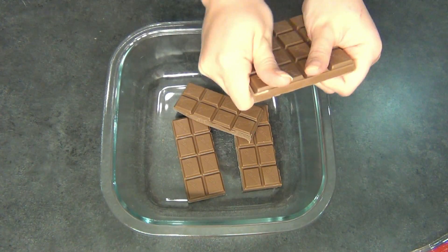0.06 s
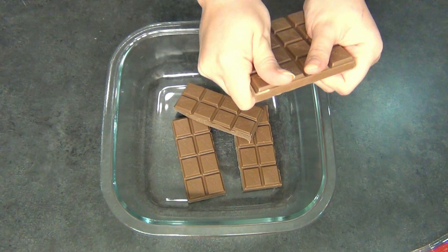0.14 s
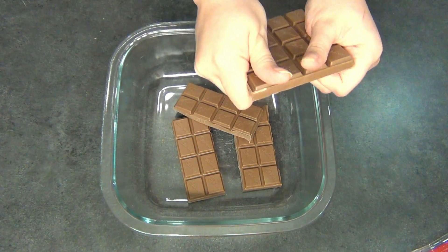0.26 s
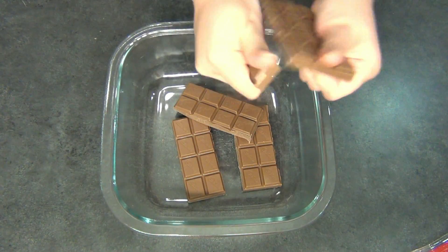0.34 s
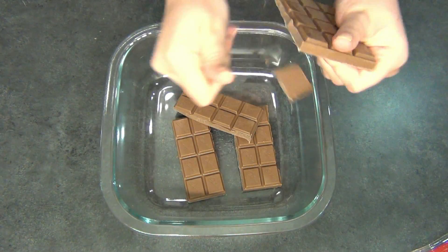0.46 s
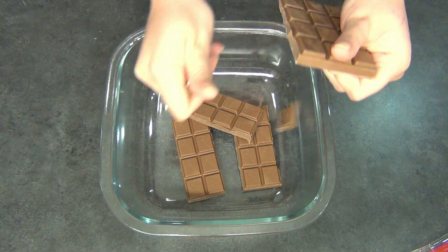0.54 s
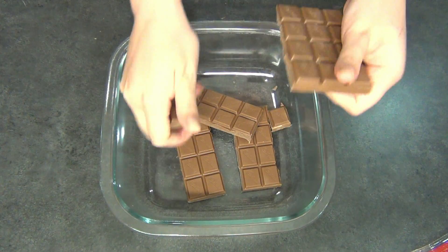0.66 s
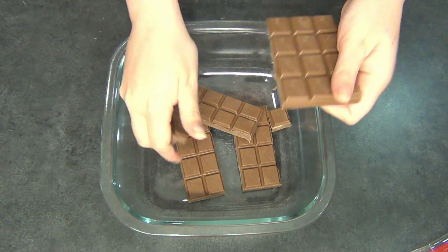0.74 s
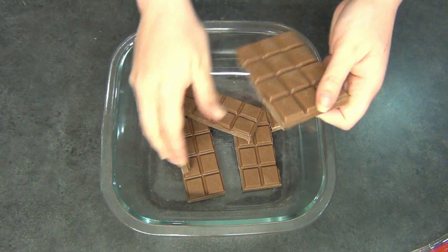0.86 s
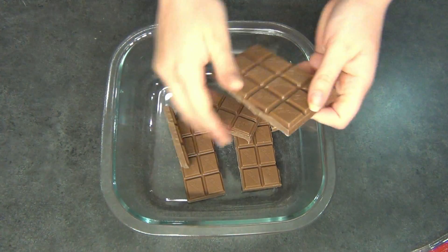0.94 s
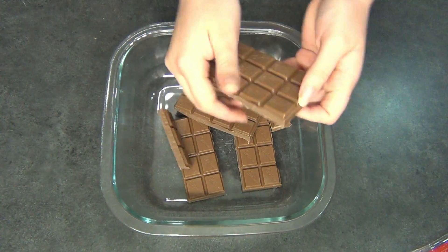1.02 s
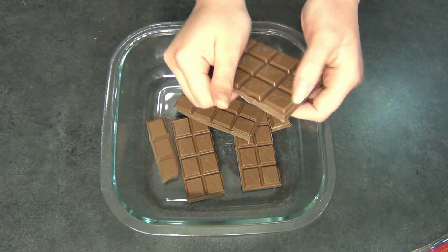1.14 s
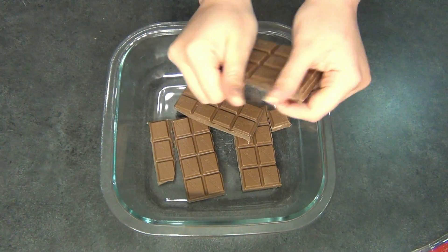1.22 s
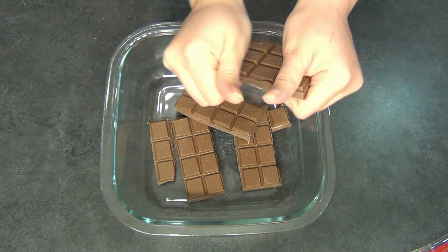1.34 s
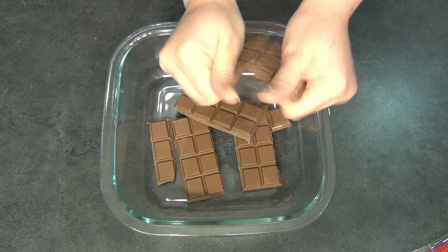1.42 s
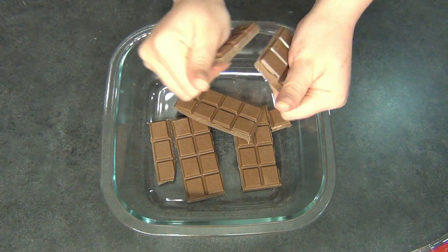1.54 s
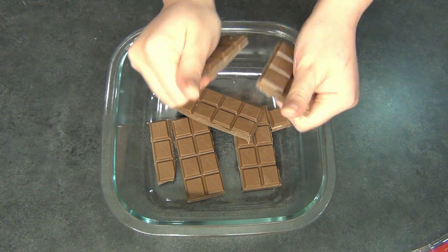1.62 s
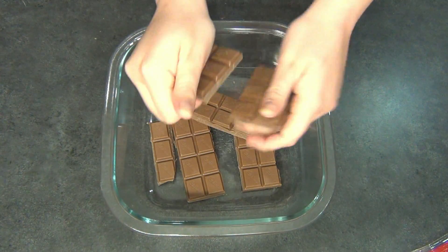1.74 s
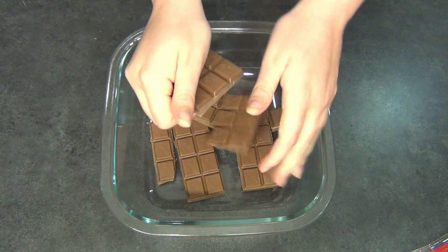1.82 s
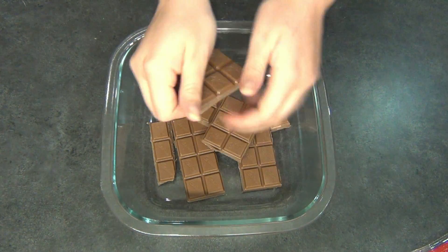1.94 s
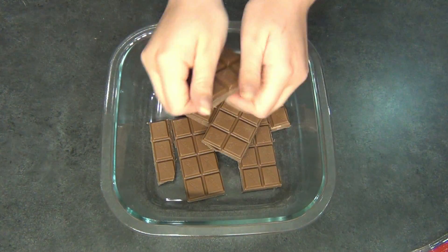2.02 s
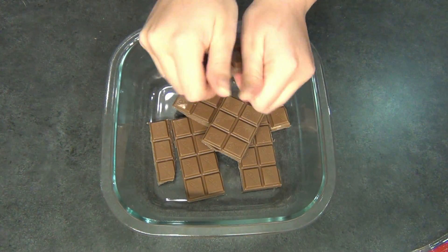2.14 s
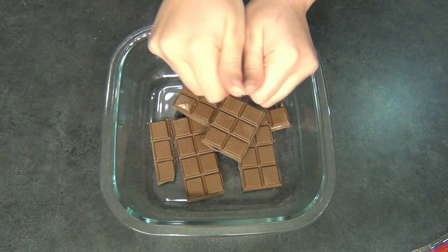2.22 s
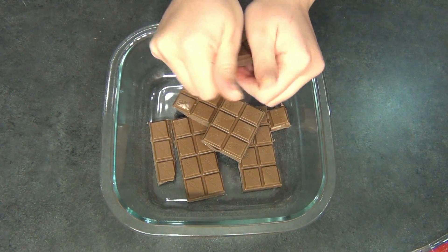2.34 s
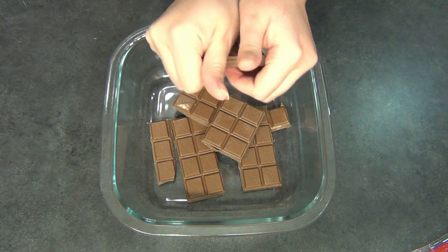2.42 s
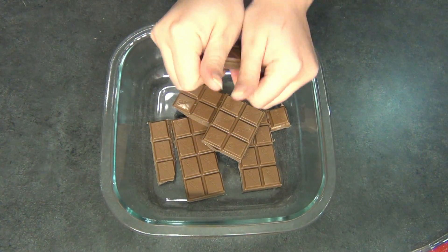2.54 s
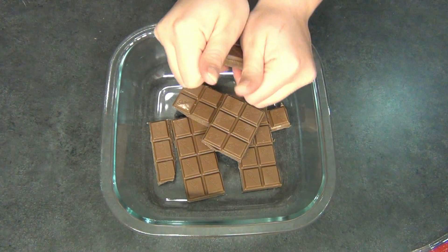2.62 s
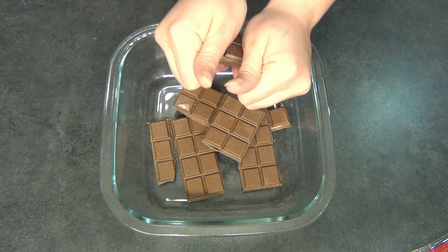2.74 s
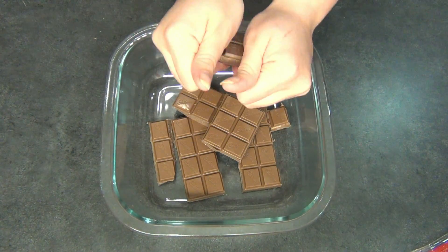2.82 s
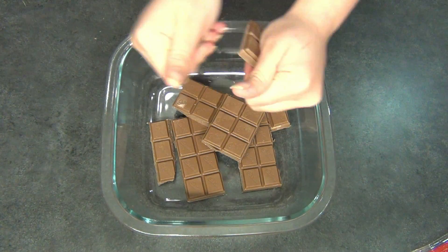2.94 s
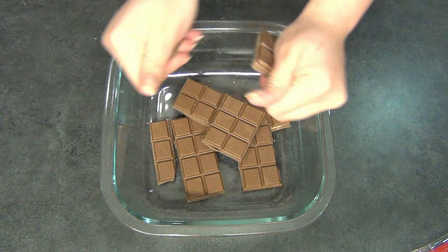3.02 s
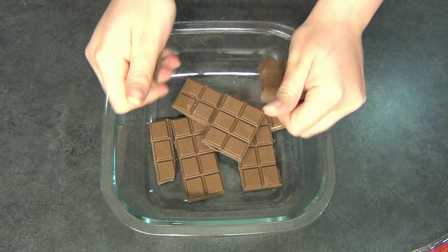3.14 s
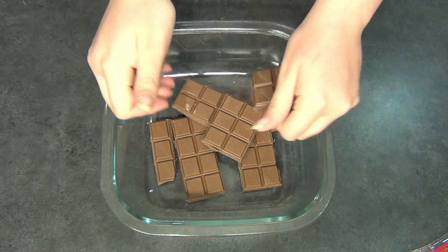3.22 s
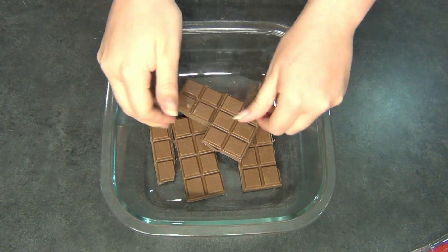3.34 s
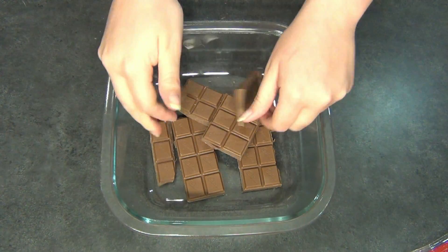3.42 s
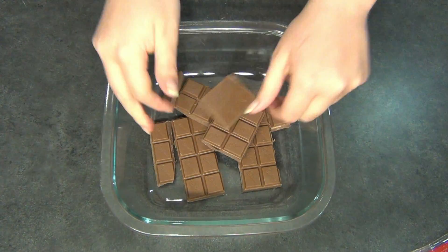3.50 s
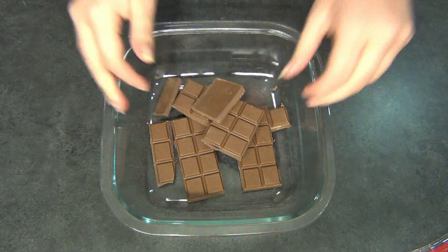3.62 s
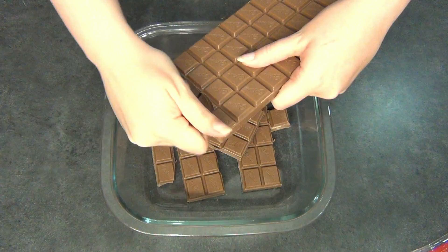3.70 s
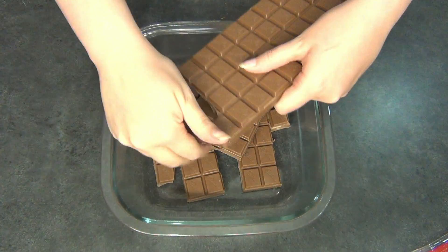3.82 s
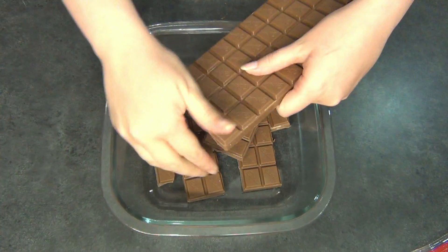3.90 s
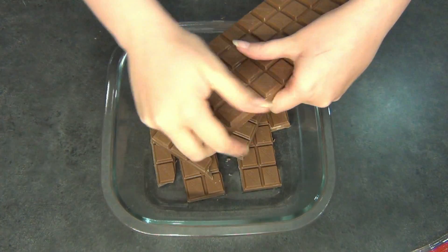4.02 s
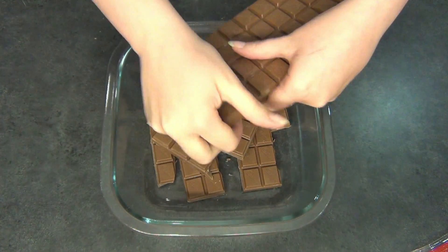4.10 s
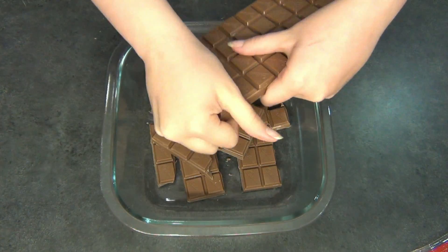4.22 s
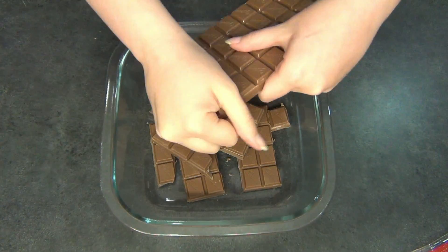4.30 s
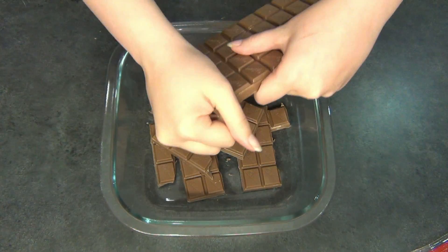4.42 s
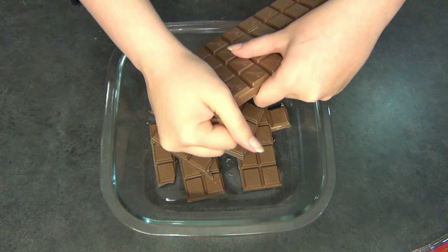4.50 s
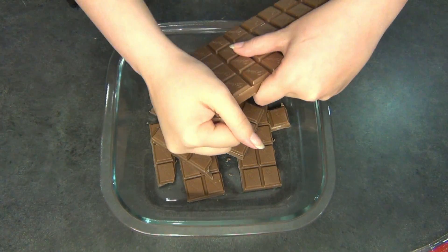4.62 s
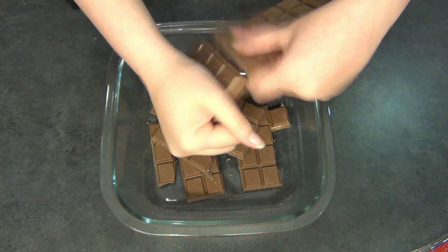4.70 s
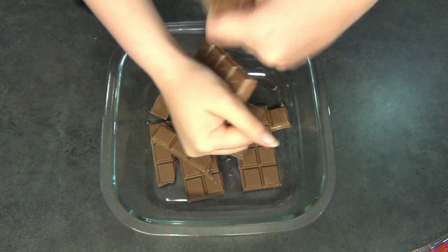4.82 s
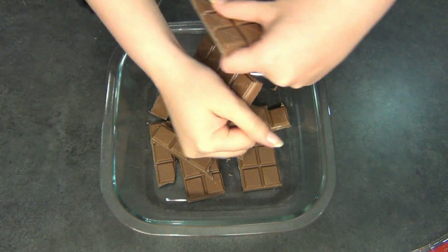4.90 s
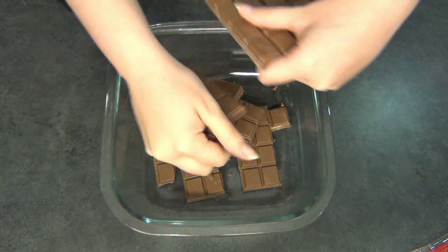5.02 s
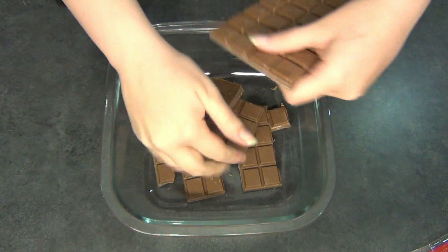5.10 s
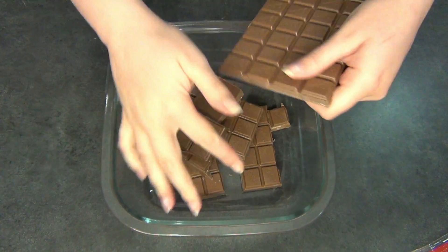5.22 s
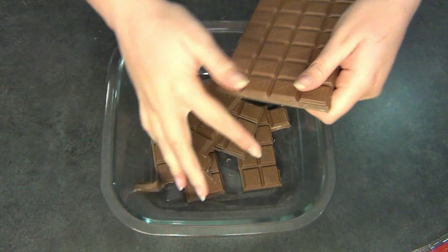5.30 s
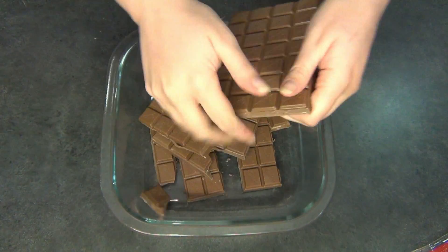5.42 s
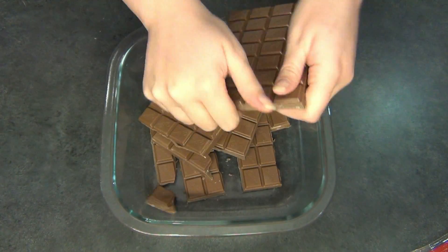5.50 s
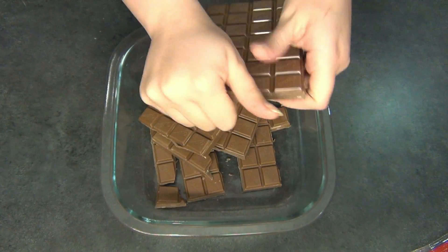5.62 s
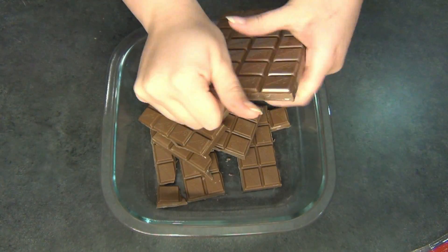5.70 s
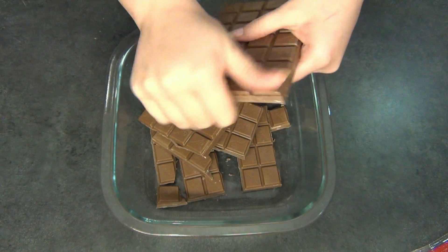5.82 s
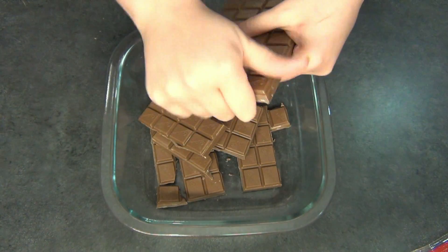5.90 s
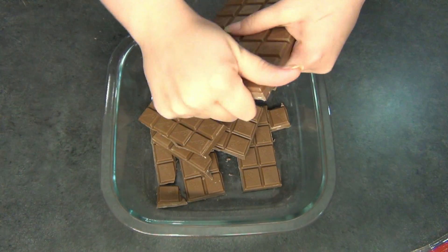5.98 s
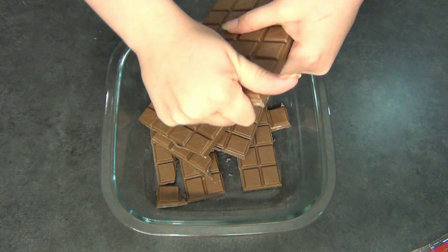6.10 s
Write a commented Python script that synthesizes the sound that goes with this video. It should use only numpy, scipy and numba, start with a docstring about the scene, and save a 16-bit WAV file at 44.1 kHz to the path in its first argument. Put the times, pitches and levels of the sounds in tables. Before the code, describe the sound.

Sharp, brittle cracks of a chocolate bar broken by hand, mixed with clacks and clinks of chunks dropping into a glass dish.

```python
"""A chocolate bar is snapped by hand, and the pieces drop into a glass dish on a kitchen worktop.
Each snap is a short, brittle crack. Each landing clacks on the glass and thumps the dish on the
worktop, and two knocks on its side make it sing. Fingers rub softly over faint room air and hum.
The bare room echoes, and a limiter turns the loud hits down so that their echo swells up behind them."""
import sys
import numpy as np
from scipy import signal
from scipy.fft import rfft, irfft, next_fast_len
from scipy.io import wavfile
from scipy.ndimage import uniform_filter1d, minimum_filter1d
from numba import njit

SR = 44100
rng = np.random.default_rng(int(sys.argv[2]) if len(sys.argv) > 2 else 0)


def unload_audio(sound):
    """Save the sound as a 16-bit wav file, at the path given as the first command line argument."""
    columns = np.transpose(np.atleast_2d(sound))
    # keep every value between -1 and 1, then stretch to whole-number steps
    steps = np.round(np.clip(columns, -1, 1) * 32767)
    wavfile.write(sys.argv[1], SR, steps.astype(np.int16))


N = 271215

# A fade time (t60) is how long a sound takes to drop by 60 dB.
# the tones of the freely ringing dish: (pitch [Hz], relative level [dB], fade time [s])
GLASS_TONES = [(839, -4.5, 0.067), (2360, -5, 0.21), (2900, -32, 0.14), (3100, -29, 0.12),
               (3670, -19, 0.12), (3940, 10, 0.048), (4630, 1.5, 0.071), (5460, -17, 0.11),
               (5240, -69, 0.05), (5580, -29, 0.16), (6150, -15.5, 0.25)]
# its highest tones, woken by a sharp edge or a knock: (pitch [Hz], relative level [dB], fade time [s])
PING_TONES = [(5670, 0, 0.11), (6500, 6, 0.081), (7500, -6, 0.05), (8000, -22, 0.049), (8800, 0, 0.088),
              (9730, 11.5, 0.062), (11870, 4, 0.12), (13100, 10, 0.062)]


def snaps(start, stop):
    """A crack races through the bar, and the freed piece rings for an instant."""
    # each break: (time [s], level [dB], pitch of the piece [Hz], piece level against the crack [dB])
    breaks = [(0.3905, 19.5, 1440, -17), (.4529, -8, 3070, 3), (1.513, 12, 725, -14.5),
              (2.9422, 6, 2270, 0.5), (4.4128, 13.5, 870, -18.5), (4.7882, 20, 1300, -11)]
    # the tone colour of a crack: (frequency [Hz], relative level [dB])
    crack_colour = [(100, -31), (300, -9.5), (700, -7), (1500, 2), (3500, 3), (6500, 3.5), (9000, 5),
                    (12000, 4.5), (14500, 3.5), (17000, -55)]
    track = np.zeros(N)
    bands = np.geomspace(300, 17000, 26)
    for s, db, hz, piece_db in between(breaks, start, stop):
        ripple_db = rng.standard_normal(len(bands))  # no two breaks have the same shape
        shape = np.c_[bands, read(crack_colour, bands) + ripple_db]
        add(track, s, unit(colour(burst(t60=0.025), shape)), db)
        add(track, s, piece_ring(hz, t60=0.02, q=1.5), db + piece_db)
    return track


def landings(start, stop):
    """A piece lands: its edge ticks, piece and glass clack, and the dish thumps on the worktop."""
    # each hit on the dish or the pile; a flat face gives a low pitch, a corner a high one:
    # (time [s], strength [dB], thump level [dB], contact pitch [Hz])
    all_hits = [ (0.619, 7.5, -10, 1760), (0.6281, 19, -10, 4300), (0.6576, 6.5, -2.5, 3830),
                (0.8848, 4.5, -1, 1700), (0.9049, 16, 10.5, 2770), (0.9126, 12.5, 3, 3460),
                (0.9172, 21, 2.5, 3020), (1.0071, 17, 7, 2920), (1.073, -7, 2.5, 2800),
                (1.178, -12.5, -5, 1620), (1.2442, 17.5, 2.5, 3960), (1.2792, 2, 5, 1680),
                (1.9082, 8.5, 4, 1610), (1.9114, 13.5, 10, 1560), (1.9193, 5, 4, 1630),
                (1.9368, 25, 10.5, 4800), (1.9631, 7.5, 5, 3750), (1.9735, 11.5, 8.5, 4380),
                (2.164, -28, -30, 9070), (3.4695, 3.5, 9, 1570), (3.4831, -16, 2, 3920),
                (3.5047, 10, 7, 1690), (3.5322, -4, -6, 7400), (3.552, 12.5, -6, 4350),
                (3.584, 4.5, 3, 2900), (3.592, 5.5, -6, 1570), (3.6086, 16.5, -1, 6400),
                (3.627, 0, 0, 4940), (3.6333, 13.5, 1.5, 3270), (3.6493, 3, -0.5, 3230),
                (3.7312, -2, -2, 3250), (3.9604, 3.5, 8, 3120), (3.9781, 8.5, 9.5, 1640),
                (3.993, 7.5, -1, 3940), (4.0314, 17.5, -7, 5480), (5.1747, 2.5, 7, 1620),
                (5.1888, 10, 9, 1570), (5.192, 10.5, -7, 1480), (5.2105, 7.5, 12.5, 3350),
                (5.2334, 9, -3, 4370), (5.3753, 18.5, 12, 5200), (5.401, 1, 5, 4250),
                (5.4308, 1, 4.5, 2970), (5.5, -3.5, 4.5, 1330), (5.567, -14, -12.5, 5980)]
    # the tone colour of a hard edge's tick: (frequency [Hz], relative level [dB])
    tick_colour = [(200, 11.5), (700, -3), (1500, 0), (4000, 8.5), (8000, 3), (10500, 4.5), (13000, -13.5),
                   (16000, -13)]
    # the dish where chocolate muffles it: (pitch [Hz], relative level [dB], fade time [s])
    clack_tones = [(1527.6, -5.5, 0.062), (1595, 4, 0.018), (2265, -17.5, 0.064), (2888, 2, 0.021),
                   (3046, 0, 0.0096), (3873, -3.5, 0.024), (4300, -4.5, 0.035), (4917, -2, 0.016),
                   (5830, -39, 0.03), (5860, -5, 0.032), (7330, -15, 0.054), (7750, -7.5, 0.02),
                   (8320, -13, 0.01), (8430, 4, 0.005)]
    # the dish rocking on the worktop: (pitch [Hz], relative level [dB], fade time [s])
    thump_tones = [(92, -20.5, 0.33), (188.4, -5.5, 0.13), (227.8, -0.5, 0.098), (266.5, 1, 0.043),
                   (373, -9, 0.049), (484, -12.5, 0.061), (642, -6.5, 0.032), (788.5, -10, 0.042)]
    track = np.zeros(N)
    hits = between(all_hits, start, stop)
    for s, db, thump_db, hz in hits + rocking(hits):
        sharpness = np.log2(hz / 3000)  # in octaves; a sharper contact sounds brighter
        tick_db = db - 14.5 + 9.96 * sharpness + 0.2 * (db - 4)  # hard hits tick extra loudly
        piece_db = db - 6.5 + 0.33 * sharpness
        clack_db = db - 3.5 - 1.9 * sharpness
        glass_db = db - 16.5 + 2.1 * sharpness
        # tones get 4.5 dB weaker for each octave away from the contact pitch
        struck_tones = [(f, level - 4.5 * abs(np.log2(f / hz)), t60) for f, level, t60 in clack_tones]
        add(track, s, unit(colour(burst(t60=0.023), tick_colour)), tick_db)
        add(track, s, ring(PING_TONES, length_s=0.07, scatter_db=3, detune=0.0203), tick_db - 16)
        add(track, s, piece_ring(hz, t60=0.015, q=2.9), piece_db)
        add(track, s, skid(), db - 19.5)
        add(track, s, ring(struck_tones, length_s=0.066, scatter_db=1, detune=0.027), clack_db)
        add(track, s, ring(GLASS_TONES, length_s=0.19, scatter_db=2, detune=0.0018), glass_db)
        # the heavy dish takes a few milliseconds to get moving
        thump = ring(thump_tones, length_s=0.2, scatter_db=1.9, detune=0.064, contact_s=0.0014)
        add(track, s, thump, thump_db)
    # a small dish gives off almost no deep bass
    return signal.sosfilt(signal.butter(2, 125, "high", fs=SR, output="sos"), track)


def piece_ring(hz, t60, q):
    """A jolted piece of chocolate rings for just a few vibrations around one pitch."""
    return unit(resonate(resonate(burst(t60), hz, q), hz, q))


def rocking(hits, mean_gap_s=0.025, loss_db=5):
    """A landed piece rocks to rest: two soft extra hits at uneven gaps, the second one weaker."""
    gaps = mean_gap_s * rng.uniform(0.5, 1.5, (len(hits), 2))
    return [(s + delay, db - 27.5 - k * loss_db, thump_db - 12 - k * loss_db, hz)
            for (s, db, thump_db, hz), delays in zip(hits, np.cumsum(gaps, axis=1))
            for k, delay in enumerate(delays)]


def skid(fade_s=0.0075, size=1800):
    """A landing piece skids on crumbs, making tiny clicks that die away."""
    clicks = rng.standard_normal(size) ** 3  # cubing makes a few spikes stand out
    fade = np.exp(-np.arange(size) / SR / fade_s)
    return unit(resonate(clicks * fade, hz=5850, q=1))


def knocks(start, stop):
    """A piece knocks the side of the dish, which sings a clear note over a shorter ring and a ping."""
    # each knock: (time [s], side wall level [dB], glass ring level [dB], ping level [dB])
    side_hits = [(0.6263, 13.5, 12.5, -1), (5.3749, 4, -15, 10)]
    # the whole side wall swinging: (pitch [Hz], relative level [dB], fade time [s])
    wall_tones = [(840, -6, 0.73), (2887, -7, 0.78), (3941, 8, 0.17), (4580, -16, 0.23),
                  (4950, -13.5, 0.73), (5270, -10, 0.37)]
    track = np.zeros(N)
    for s, wall_db, glass_db, ping_db in between(side_hits, start, stop):
        add(track, s, ring(wall_tones, length_s=0.7, scatter_db=0.5, detune=0.0001), wall_db)
        add(track, s, ring(GLASS_TONES, length_s=0.283, scatter_db=0.7, detune=0.0014), glass_db)
        add(track, s, ring(PING_TONES, length_s=0.1, scatter_db=3, detune=0.002), ping_db)
    return track


def burst(t60, size=1024):
    """A shower of tiny cracks, about equally strong at all pitches, dies within milliseconds."""
    fade = undb(-60 * np.arange(size) / SR / t60)
    x = rng.standard_normal(size) * fade
    for _ in range(4):  # even out the pitches, then restore the fade
        spectrum = rfft(x)
        x = irfft(spectrum / (np.abs(spectrum) + 1e-9)) * np.sqrt(fade)
    return x


def ring(tones, length_s, scatter_db, detune, contact_s=0.00019):
    """Struck tones swell, then fade; each spot that is hit shifts their levels and pitches a little."""
    hz, db, t60 = np.transpose(tones)[:, :, None]
    t = np.arange(int(length_s * SR)) / SR
    weight, shift, phase = rng.standard_normal((3, len(tones), 1))
    envelope = np.exp(-np.log(1000) * t / t60) * (1 - np.exp(-t / contact_s))
    waves = np.sin(2 * np.pi * (hz * (1 + detune * shift) * t + phase))
    return unit(np.sum(undb(db + scatter_db * weight) * envelope * waves, axis=0))


def rubs():
    """Skin hisses softly as fingers slide over the chocolate."""
    # each slide: (time of its middle [s], half its length [s], loudest level [dB], hiss pitch [Hz])
    slides = [(2.622, 0.12, -54.5, 13500), (5.657, .04, -52, 8900), (5.782, 0.063, -52, 10900),
              (5.88, 0.044, -54, 8700), (6.037, 0.044, -49.5, 10300)]
    track = np.zeros(N)
    for s, half_s, db, hz in slides:
        count = int(2 * half_s * SR)
        hiss = resonate(rng.standard_normal(count), hz, q=1.6)
        add(track, s - half_s, hiss / hiss.std() * np.hanning(count) ** 2, db)
    return track


def kitchen(wall_echo_db=-8.5, build_s=0.0012, bounce_s=0.00078):
    """How the room answers one click: the click itself, a bounce off the dish, then the walls' echo."""
    # how long the echo lasts, the highs dying first: (frequency [Hz], fade time [s])
    echo_times = [(100, 1), (250, 0.64), (1000, .92), (2500, 0.71), (5000, 0.76), (9000, 0.59),
                  (15000, 0.47)]
    # the tone colour of the echo: (frequency [Hz], level [dB])
    echo_colour = [(60, -5.5), (200, 2), (500, 5.5), (1200, 2.5), (2500, 0.5), (5000, -5.5), (9000, -4.5),
                   (13000, -7.5), (16000, -14)]
    # how wide the echo sounds: (frequency [Hz], stereo width [dB])
    echo_width = [(60, -43), (110, -35), (200, -64), (380, -19), (700, -11.5), (1290, -13.5), (2380, -9.5),
                  (4400, -7.5), (8120, -6.5), (15000, -23)]
    # the dish's bass is stronger on the left: (frequency [Hz], left minus right [dB])
    left_lead = [(60, 3.5), (125, 2.5), (250, 3), (500, 1.2), (1300, 0.6), (4400, 1), (12000, -1.5)]
    t = np.arange(SR) / SR
    spectrum = rfft(stereo_noise(echo_width, count=SR))
    hz = np.fft.rfftfreq(SR, 1 / SR)
    edges = np.r_[0, np.geomspace(150, SR / 2, 12)]
    echo = np.zeros((2, SR))
    for low, high in zip(edges, edges[1:]):
        band = irfft(spectrum * ((hz >= low) & (hz < high)))
        echo += band * np.exp(-np.log(1000) * t / read(echo_times, (low + high) / 2))
    echo *= 1 - np.exp(-(t / build_s) ** 2)  # echoes take a moment to gather
    response = undb(wall_echo_db) * colour(np.sqrt(2) * unit(echo), echo_colour)
    # the nearest echoes differ between left and right, most of all in the highs
    near_echo = unit(resonate(burst(t60=0.0048), hz=12300, q=1))
    response[:, :len(near_echo)] += undb(-17) * near_echo * np.array([[1], [-1]])
    response[:, 0] += 1  # the click itself
    response[:, int(bounce_s * SR)] += 0.077
    return np.array([colour(channel, [(f, side * db / 2) for f, db in left_lead])
                     for channel, side in zip(response, (1, -1))])


def background(air_db=-51.5):
    """Still room air and a faint electrical hum from the mains."""
    # the tone colour of the air: (frequency [Hz], relative level [dB])
    air_colour = [(15, -31), (25, -29), (70, -8), (92, -16), (137, -7.5), (200, 2.5), (229, -9),
                  (503, -4.5), (796, -14), (911, -9.5), (1330, -16), (1520, -18), (2610, -22.5),
                  (16000, -26)]
    # how wide the air sounds: (frequency [Hz], stereo width [dB])
    air_width = [(60, -37), (110, -47), (200, -27), (380, -20), (700, -14), (1290, -4.5), (2380, -6),
                 (4400, -7.5), (8120, -7), (15000, -17)]
    # the tones of the hum: (pitch [Hz], level [dB])
    hum_tones = [(99.5, -65), (199.5, -66), (300, -66)]
    t = np.arange(N) / SR
    air = colour(stereo_noise(air_width, count=N), air_colour)
    hum = sum(np.sqrt(2) * undb(db) * np.sin(2 * np.pi * (hz * t + rng.random())) for hz, db in hum_tones)
    return undb(air_db) * air / air.std() + hum


def stereo_noise(width, count):
    """Noise from all around; width is the level of what differs left and right against what is shared."""
    shared, difference = rng.standard_normal((2, count))
    return shared + colour(difference, width) * np.array([[1], [-1]])


def undb(db):
    """Turn decibels into a number to multiply by."""
    return 10 ** (np.asarray(db) / 20)


def read(points, hz):
    """Look up a (frequency, value) table, sliding between its rows on a musical pitch scale."""
    frequencies, values = np.transpose(points)
    return np.interp(np.log(np.maximum(hz, 1)), np.log(frequencies), values)


def unit(x):
    """Scale a sound so that its total energy is 1."""
    return x / np.sqrt(np.sum(x ** 2))


def colour(x, points):
    """Turn lows and highs up or down, following a (frequency [Hz], level [dB]) table."""
    size = next_fast_len(x.shape[-1] + 4096) // 2 * 2
    gains = undb(read(points, np.fft.rfftfreq(4096, 1 / SR)))
    # folding the cepstrum (the log gains, transformed) stops the filter ringing ahead of a hit
    cepstrum = irfft(np.log(gains))
    cepstrum[1:2048] *= 2
    cepstrum[2049:] = 0
    response = irfft(np.exp(rfft(cepstrum)))
    return irfft(rfft(x, size) * rfft(response, size), size)[..., :x.shape[-1]]


def resonate(x, hz, q):
    """Keep the sound around one pitch; a higher q keeps a narrower range."""
    return signal.lfilter(*signal.iirpeak(min(hz, 0.4 * SR), max(q, 1), fs=SR), x)


def add(track, s, sound, db):
    """Mix a sound into the track, starting at s seconds."""
    start = int(s * SR)
    part = sound[:N - start]
    track[start:start + len(part)] += undb(db) * part


def between(rows, start, stop):
    """Pick the events that begin between two times."""
    return [row for row in rows if start <= row[0] < stop]


def handling(room, start, stop):
    """Everything snapped and dropped between two times, with the room's echo."""
    sounds = snaps(start, stop) + landings(start, stop) + knocks(start, stop)
    return signal.fftconvolve(sounds[None], room, axes=1)[:, :N]


def scene(split_s=3.759):
    """Two spells of snapping and dropping in one room; the ringing of the first stops short."""
    room = kitchen()
    quick_fade = np.clip((split_s - np.arange(N) / SR) / 0.002, 0, 1)
    first_spell = handling(room, 0, split_s) * quick_fade
    second_spell = handling(room, split_s, np.inf)
    return first_spell + second_spell + rubs() + background()


@njit
def recover(cut, keep):
    """The limiter's cut in volume jumps up at once, then ebbs away."""
    out = cut.copy()
    for i in range(1, len(out)):
        out[i] = max(out[i], out[i - 1] * keep + 1e-18)
    return out


def limiter(x, ceiling_db=-4.0, release_s=0.011, window=45):
    """Look a millisecond ahead and turn the volume down to hold peaks at the ceiling."""
    peak_db = 20 * np.log10(np.abs(x).max(axis=0) + 1e-9)
    over_db = np.maximum(peak_db - ceiling_db, 0)
    held_db = -minimum_filter1d(-over_db, window)  # the biggest overshoot nearby
    cut_db = recover(held_db, np.exp(-1 / (release_s * SR)))
    return x * undb(-uniform_filter1d(cut_db, window))


def record(dry):
    """Squash the peaks, then remove the very highest pitches, above 16200 Hz."""
    low_pass = signal.ellip(8, 0.2, 70, 16200, fs=SR, output="sos")
    return signal.sosfilt(low_pass, limiter(dry))


dry = scene()
out = record(dry)
unload_audio(out)
```